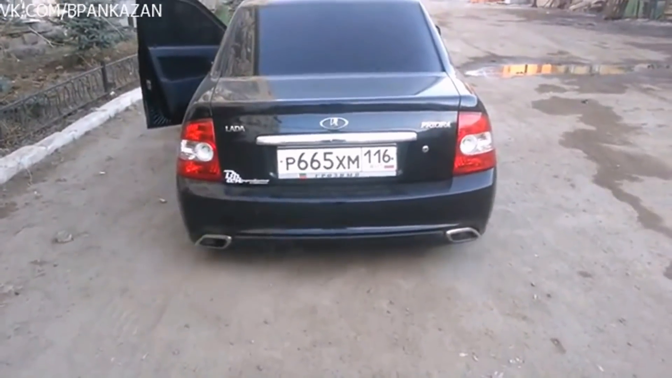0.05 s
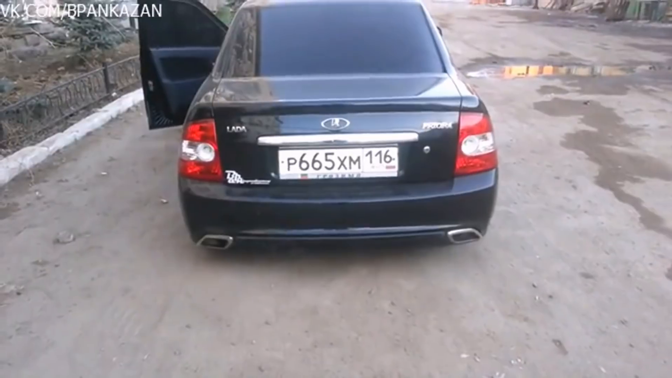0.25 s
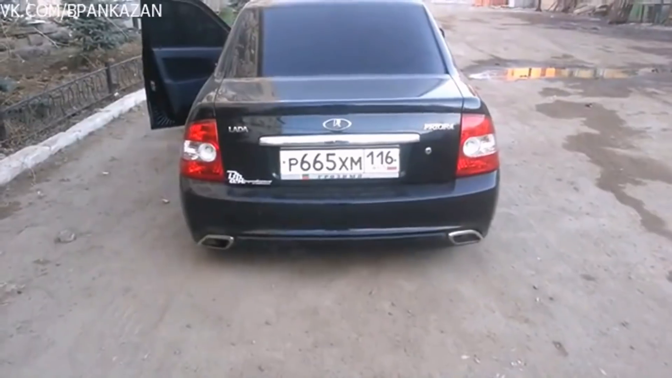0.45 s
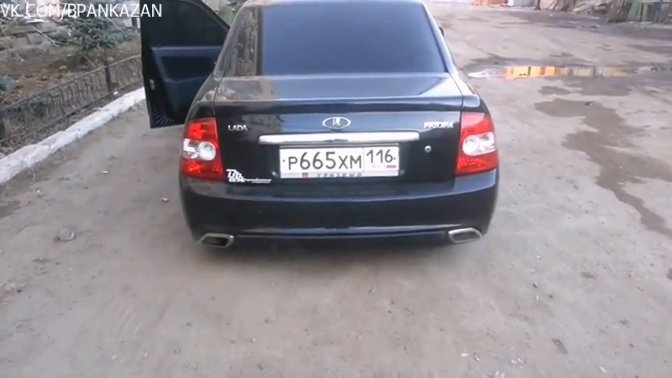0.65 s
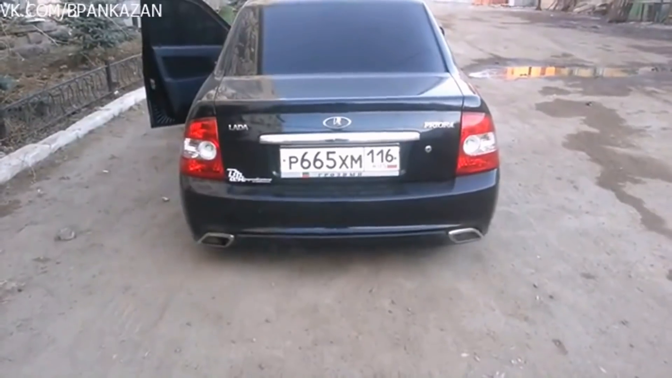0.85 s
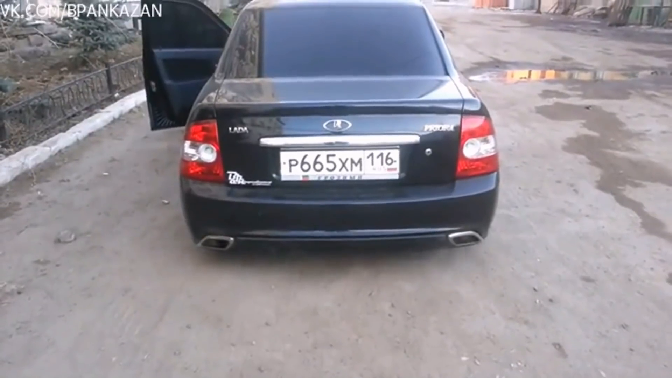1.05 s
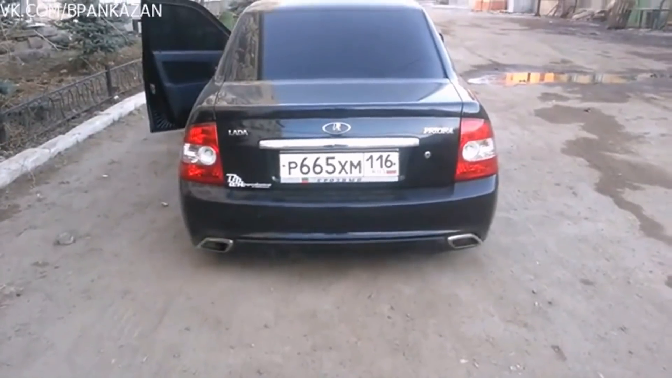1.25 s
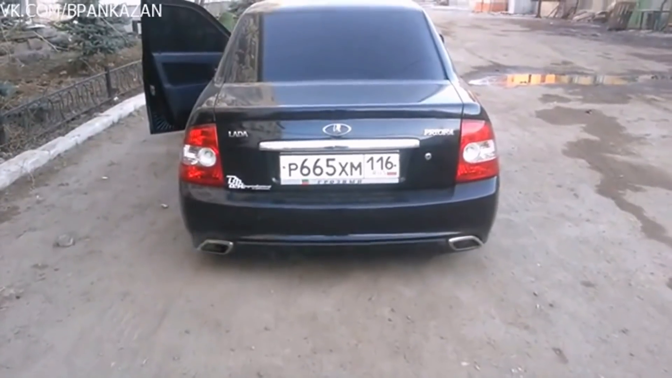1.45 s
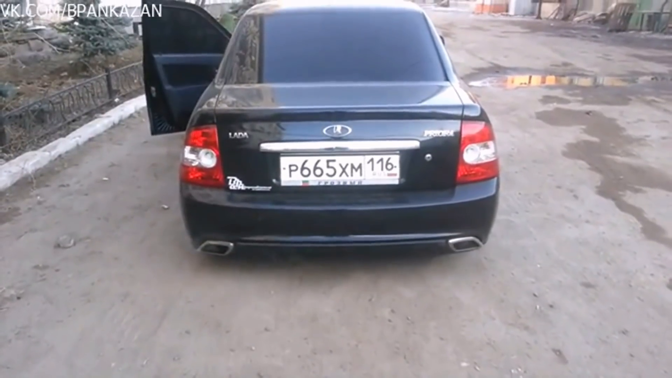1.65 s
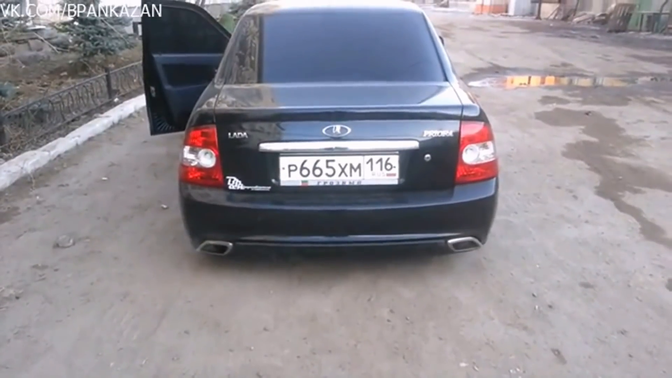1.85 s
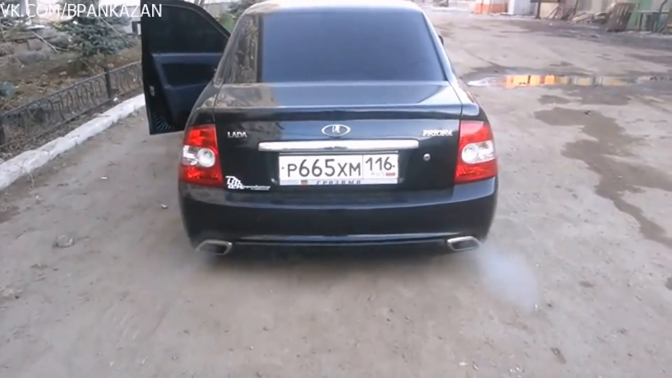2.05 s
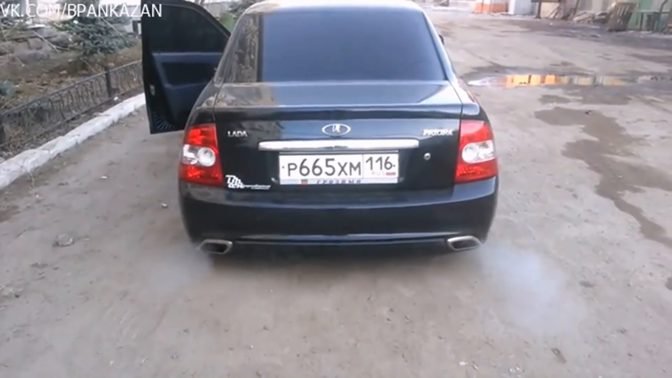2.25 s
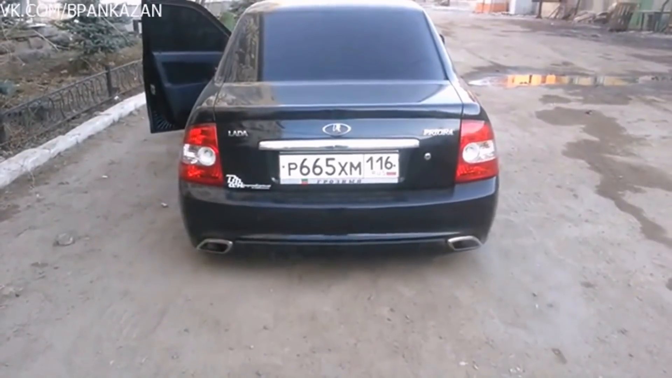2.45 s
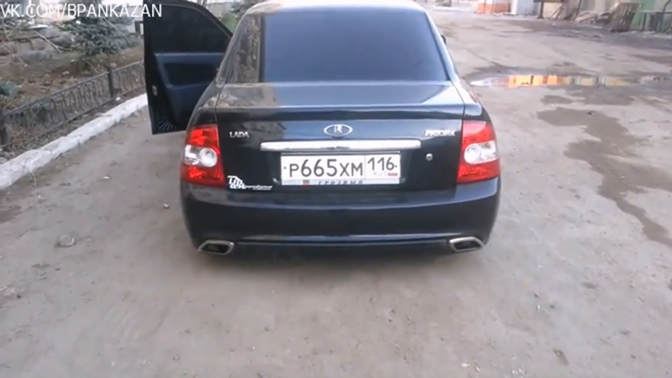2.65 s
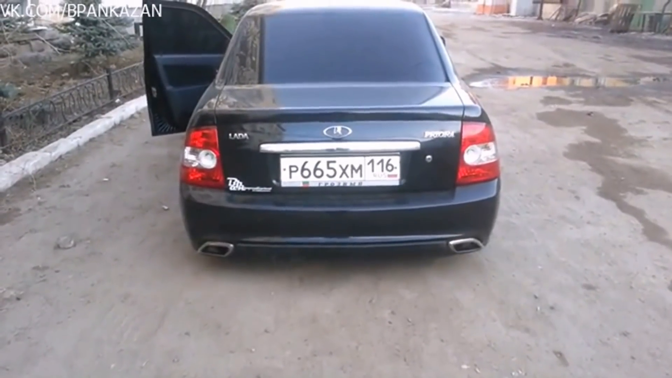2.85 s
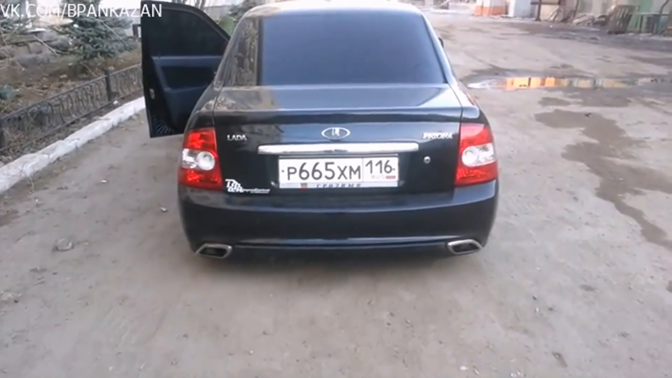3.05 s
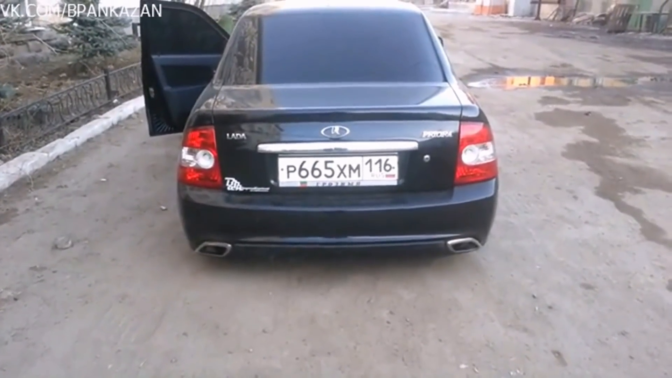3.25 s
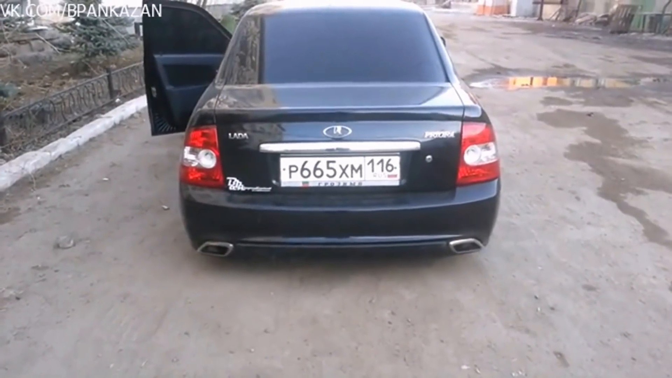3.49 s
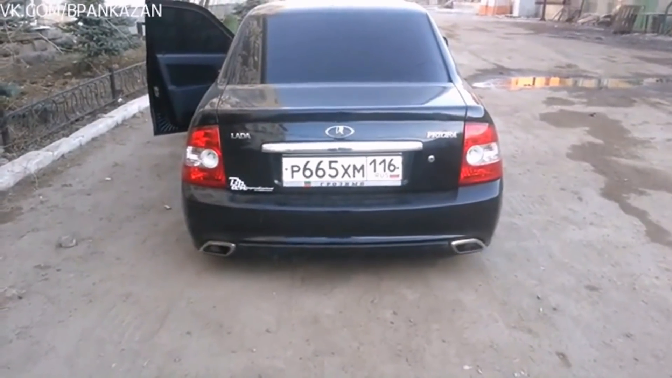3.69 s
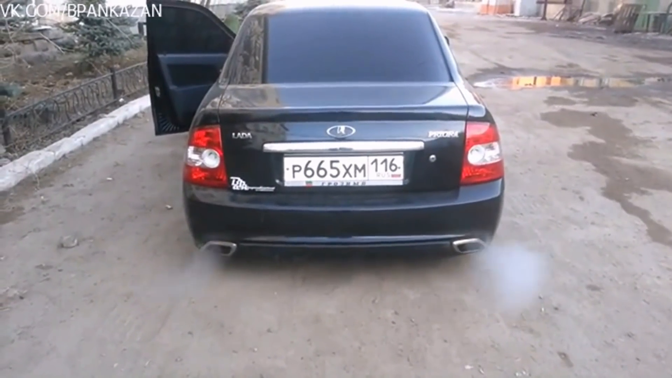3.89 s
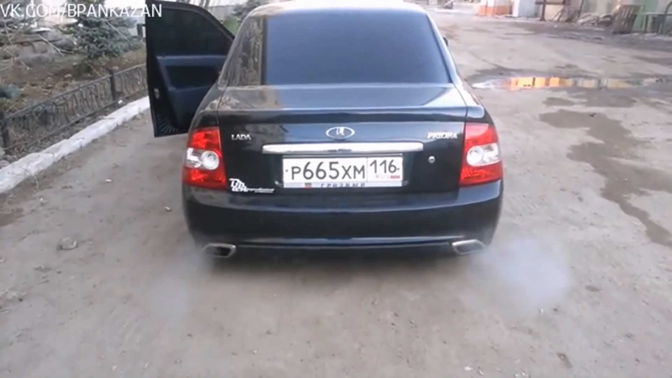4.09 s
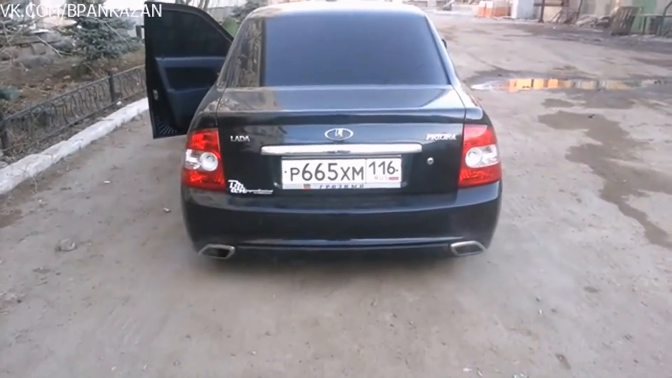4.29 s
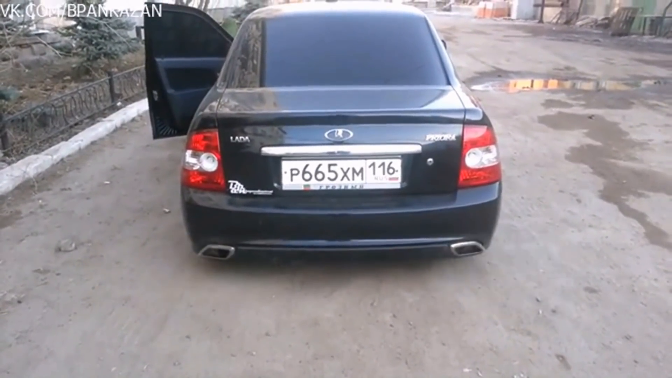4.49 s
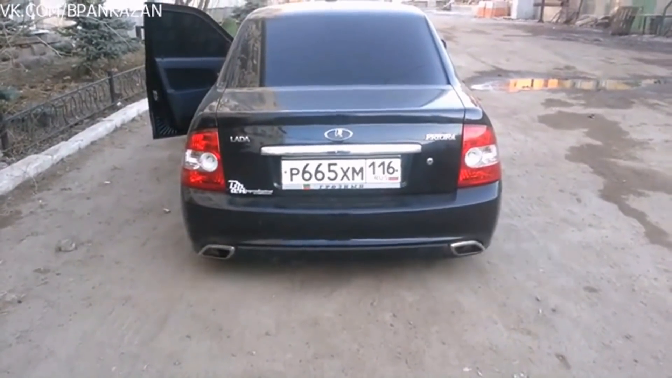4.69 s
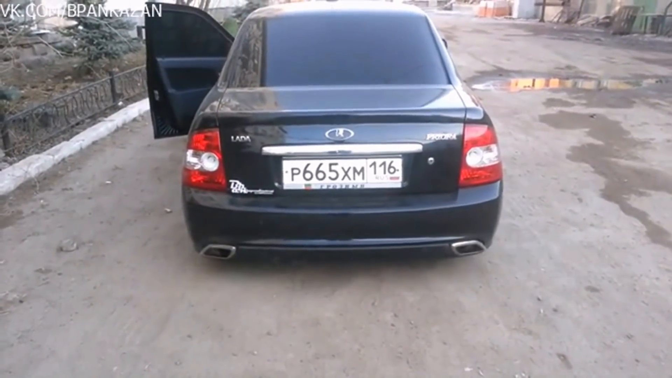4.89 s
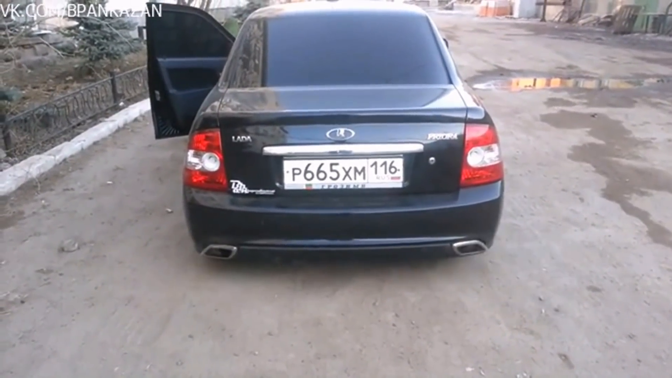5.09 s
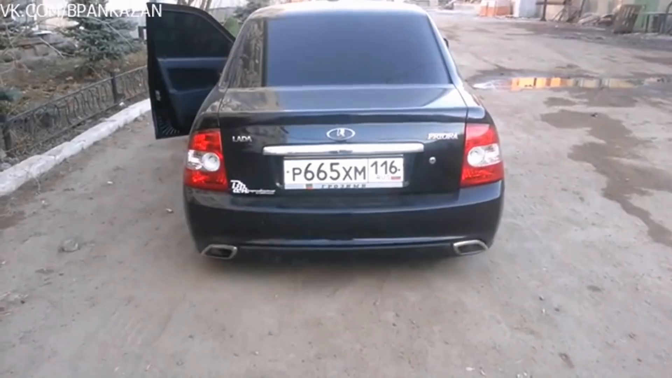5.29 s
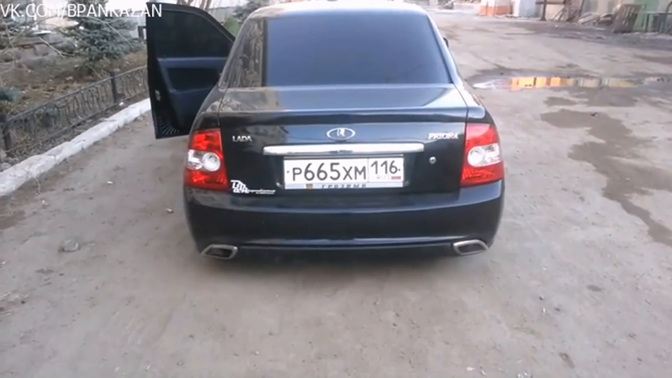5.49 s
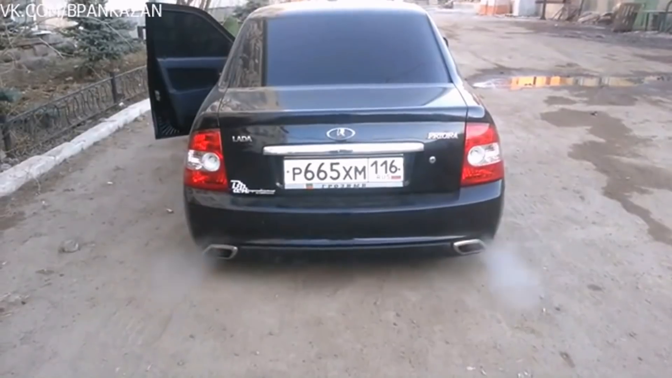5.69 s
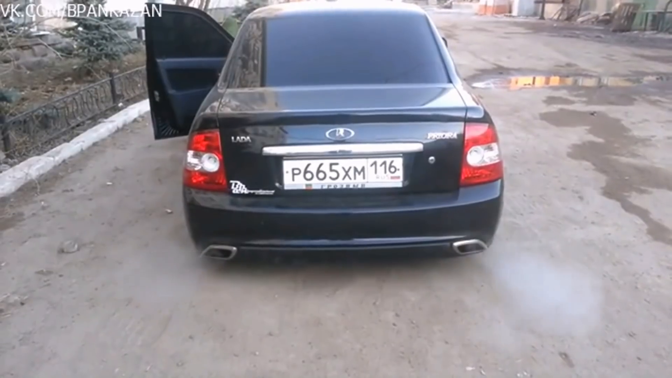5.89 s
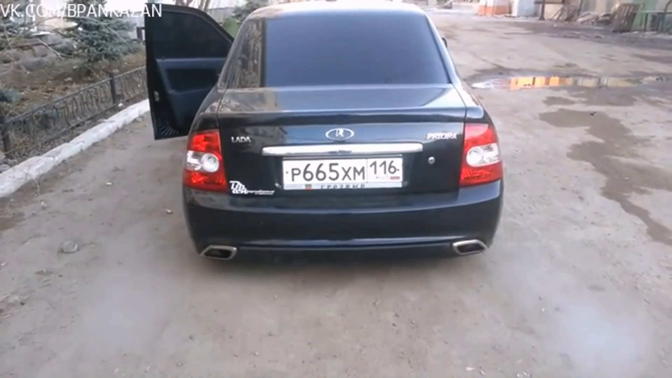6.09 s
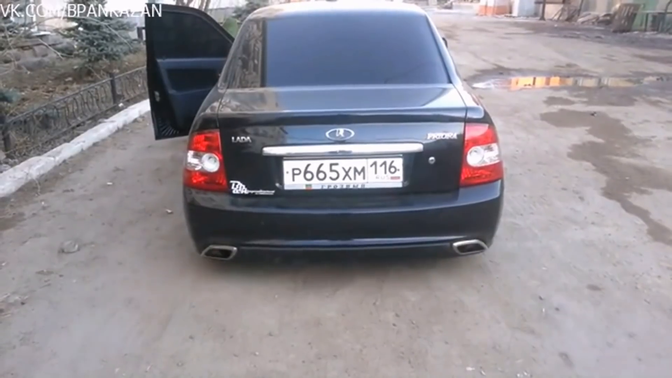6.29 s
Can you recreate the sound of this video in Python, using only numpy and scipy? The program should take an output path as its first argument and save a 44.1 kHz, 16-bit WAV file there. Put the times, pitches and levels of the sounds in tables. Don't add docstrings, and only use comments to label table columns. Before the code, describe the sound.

Close behind twin tailpipes, uneven low idling gives way to three sharp throttle blips with barking exhaust, wet spitting hiss and crackling overrun.

```python
import sys
import numpy as np
from scipy import signal
from scipy.fft import rfft, irfft, next_fast_len
from scipy.io import wavfile
from scipy.ndimage import uniform_filter1d, map_coordinates

SR = 44100
rng = np.random.default_rng(int(sys.argv[2]) if len(sys.argv) > 2 else 0)


def gain_from_db(level_db):
    decades = np.asarray(level_db, float) / 20
    return 10 ** decades


def output_pcm(signal):
    pcm = np.clip(np.atleast_2d(signal).T, -1, 1) * 32767
    wavfile.write(sys.argv[1], SR, np.round(pcm).astype(np.int16))


N = 279153


def along(points, hz):
    f, v = np.transpose(points)
    return np.interp(np.log(hz + 1), np.log(f + 1), v)


def curves(rows):
    s, *cols = np.transpose(rows)
    return [np.interp(np.arange(N) / SR, s, c) for c in cols]


def wobble(rate):
    knots = rng.standard_normal(int(N * rate / SR) + 4)
    return map_coordinates(knots, [np.arange(N) * rate / SR])


def level(x, span):
    width = int(span * SR)
    power = uniform_filter1d(uniform_filter1d(np.mean(x ** 2, axis=0), width), width)
    return x / np.sqrt(np.abs(power) + 1e-4 * np.mean(power))


def filtered(x, response):
    m = next_fast_len(N + SR // 2)
    return irfft(rfft(x, m) * response(np.fft.rfftfreq(m, 1 / SR)), m)[..., :N]


def modes(table, low_hz, top_hz):
    def fall(u):
        return 1 / (1 - u * u + 1.4j * u) ** 2

    def ring(f):
        return sum(gain_from_db(db) * 1j * f * w / (c * c - f * f + 1j * f * w) for c, w, db in table)

    return lambda f: ring(f) * fall(f / top_hz) * fall(-low_hz / (f + 1))


def tone(hz):
    return np.sqrt(2) * np.sin(2 * np.pi * np.cumsum(hz) / SR)


# frequency in Hz, likeness from 0 to 1.
LIKENESS = [(30, .55), (60, 1), (130, 0.92), (300, .95), (640, 0.86), (1400, 0.27), (3100, 0.2),
            (15000, .05)]


def spread(pair, response):
    def turn(hz):
        return np.arccos(np.clip(along(LIKENESS, hz), 0, 1)) / 2

    mid, side = filtered(pair, lambda hz: response(hz) * [np.cos(turn(hz)), np.sin(turn(hz))])
    return np.array([mid + side, mid - side])


# pedal down in seconds, strongest flow in seconds, pedal up in seconds,
# fuel returns in seconds, strength in dB.
BLIPS = [
    (-1.9, -1.6, -1.1, 1.06, -12),
    (1.894, 2.125, 2.275, 2.94, 0),
    (3.666, 3.92, 4.125, 5.035, 1),
    (5.541, 5.92, 6.075, 6.75, 12),
]


def load():
    rows = []
    for down, peak, up, fuel, db in BLIPS:
        rows += [(down - .024, .3), (down, 1)]
        rows += [(up - .045, .9), (up + .035, .3)]
        rows += [(fuel, .3), (fuel + .33, .2)]
    return curves(rows)[0]


# time in seconds, firings per second.
CRANK_RUNS = [
    [(0, 45), (.5, 48), (.65, 47), (1.1, 36), (1.87, 32)],
    [(1.894, 35), (1.94, 38), (2.0, 51), (2.05, 56), (2.11, 69), (2.27, 73), (2.95, 56), (3.3, 36),
     (3.64, 34)],
    [(3.666, 38), (3.72, 48), (3.85, 70), (3.95, 83), (4.12, 85), (4.6, 77), (5.03, 62), (5.35, 36),
     (5.52, 33)],
    [(5.541, 37), (5.58, 46), (5.65, 55), (5.75, 75), (5.89, 115), (6.0, 116), (6.1, 108), (6.33, 97)],
]


def firing_rate():
    return curves(sum(CRANK_RUNS, []))[0]


# rasp in dB,
# hiss in dB, rumble in dB, bark over body in dB, share of the blip's strength from 0 to 1.
BLIP_STAGES = [(-51, -63, -37, -13, 0), (-41, -57, -32, -8, 0), (-35, -52, -24, -9, 0),
               (-24, -56, -20, -1, 0), (-26, -39, -31, -.5, .4), (-20.5, -31.5, -33, 2.5, .15),
               (-35, -46, -35, -3, 1), (-41.5, -51, -28, -6.5, 0), (-43.5, -52.5, -28, -10, .35),
               (-35.5, -46, -31, -9.5, .9), (-36, -48, -33, -8, .1), (-43.5, -60, -36, -12, 1)]


def stages():
    jet_rate, snap = 68, .02
    rasp_share = .3
    rows, rate = [], firing_rate()
    for down, peak, up, fuel, strength in BLIPS:
        fast = np.argmax((rate > jet_rate) & (np.arange(N) > down * SR)) / SR
        when = [down - .15, down - snap,
                down, down + .065,
                min(fast, peak - snap), peak,
                up, up + snap,
                fuel - .33, fuel - .18,
                fuel, fuel + snap]
        for s, (rasp_db, hiss_db, rumble_db, bark_db, share) in zip(when, BLIP_STAGES):
            gain = share * strength
            rows.append((s, rasp_db + rasp_share * gain, hiss_db + gain,
                         rumble_db + rasp_share * min(strength, 0), bark_db))
    return curves(rows)


FILLING = [3, 1, -4, -2]


def firings(scatter, size_db):
    out = np.zeros(N + SR)
    steady = load()
    for run in CRANK_RUNS:
        s, rate = np.transpose(run)
        t = np.arange(s[0], s[-1], 1 / SR)
        turns = np.cumsum(np.interp(t, s, rate)) / SR
        when = np.interp(np.arange(int(turns[-1]) + 1), turns, t)
        loose = 1 - steady[np.minimum(when * SR + 1, N - 1).astype(int)]
        luck = rng.standard_normal((len(when), 2))
        when = when + (.008 + scatter * loose) * luck[:, 0] / np.interp(when, s, rate)
        filling_db = (.15 + loose) * np.resize(FILLING, len(when))
        blow_db = filling_db + (1.5 + size_db * loose) * luck[:, 1]
        np.add.at(out, np.abs(when * SR).astype(int), gain_from_db(blow_db))
    return out[:N]


def puff(blows, decay):
    t = np.arange(SR // 8) / SR
    shape = np.exp(-t / decay) * (1 - np.exp(-t / 0.0011))
    return signal.fftconvolve(blows, shape / np.linalg.norm(shape))[:N]


# frequency in Hz, density in dB per Hz.
RUMBLE = [(12, -48), (20, -18), (43, -21), (92, -7), (102, -17), (115, 1), (150, -18), (250, -120)]
# frequency in Hz, density in dB per Hz.
YARD_AIR = [(290, -61), (500, -10), (1170, -12.5), (1580, -20), (2360, -20.5), (5920, -37), (9510, -40),
            (12300, -43), (14400, -44), (15500, -77)]


def yard():
    rumble_db = stages()[2]
    rumble = level(spread(rng.standard_normal((2, N)), lambda hz: gain_from_db(along(RUMBLE, hz))), 0.41)
    air = level(spread(rng.standard_normal((2, N)), lambda hz: gain_from_db(along(YARD_AIR, hz))), 1)
    return gain_from_db(rumble_db) * rumble + gain_from_db(-41.5) * air


# time in seconds, level in dB.
SNAPS = [
    (.238, -14),
    (.2431, 1),
    (0.6503, -20),
    (0.6632, 1.5),
]


def ticks():
    out, t = np.zeros(N), np.arange(SR // 50) / SR
    for s, db in SNAPS:
        pull = -np.sin(2 * np.pi * 2500 * t) * np.exp(-t / .0003)
        push = .5 * (1 - np.exp(-t / .0003)) * np.exp(-t / .0008)
        ring = 0.057 * rng.standard_normal(len(t)) * np.exp(-t / 0.0025)
        out[round(s * SR):][:len(t)] += gain_from_db(db) * (pull + push + ring)
    return out * gain_from_db(np.array([[0], [-17]]))


# time in seconds, peak in dB.
LATE_BURNS = [(.445, -10), (.519, -5), (.57, -10), (.9, -10), (2.247, -8), (2.327, -22), (2.44, -38),
              (2.469, -9), (2.565, -11), (2.841, -19), (3.21, -16), (4.161, -18), (4.234, -5), (4.297, -9),
              (4.371, -19), (4.399, -2), (4.508, -24), (4.573, -5), (4.85, -18), (6.076, -16), (6.131, -11),
              (6.181, -10), (6.255, -8), (6.292, 2.5)]
# frequency in Hz, width in Hz, level in dB.
BARK_MODES = [(384, 13.7, -6), (436, 35, 5.5), (486, 29.5, -0.5), (526.8, 29, -1), (450, 210, -16),
              (668, 67, -11), (745, 43, -9), (863.5, 39, -2), (970, 21, -10), (1180, 410, -24.5)]
# frequency in Hz, width in Hz, level in dB.
RASP_MODES = [(1343, 167, -11.5), (1462, 79, 4), (1650, 290, 3.5), (2020, 67, 3), (2283, 113, 5),
              (2455, 83, -7), (3550, 4500, -38.5)]


def pops():
    blows = np.zeros(N)
    for s, db in LATE_BURNS:
        blows[round(s * SR)] = gain_from_db(db + 23.5)
    gas = puff(blows, 0.009) * rng.standard_normal((2, N))
    bark, tips = modes(BARK_MODES, 260, 1150), modes(RASP_MODES, 900, 3000)
    return spread([blows + gas[0], gas[1]], lambda f: bark(f) + gain_from_db(-17) * tips(f))


# frequency in Hz, difference in dB.
RIGHT_LOUDER = [(3000, -18.5), (4400, 5), (8000, 15), (15000, 5.5)]


def hiss(spectrum):
    def response(hz):
        return gain_from_db(along(spectrum, hz) + np.outer([-.5, .5], along(RIGHT_LOUDER, hz)))

    noise = filtered(rng.standard_normal((2, N)), response)
    return noise * np.sqrt(2 / np.mean(noise ** 2))


# frequency in Hz, density in dB per Hz.
STRONG_HISS = [(2060, -35), (3500, -5.5), (4550, -4.5), (5550, -0.5), (6690, -4), (7530, -0.5), (14000, -4),
               (14900, -11), (15200, -25), (15500, -62)]
# frequency in Hz, density in dB per Hz.
WEAK_HISS = [(1470, -37.5), (2500, -17), (2770, -23), (3230, -1), (6700, -8.5), (7420, -9.5), (11500, -13),
             (12200, -30), (14500, -29)]
# time in seconds, peak in dB, 60 dB decay in seconds.
WET_SPITS = [(1.894, -28, 0.11), (1.9235, -21.5, 0.1), (1.9475, -20.5, 0.18), (1.9749, -30, 0.23),
             (1.9927, -11, 0.092), (2.0285, -11, 0.14), (2.0494, -15, 0.059), (2.0752, -22, 0.16),
             (2.1593, -6.5, 0.066), (2.206, -13, 0.099), (2.262, -14.5, 0.085), (3.695, -15, 0.09),
             (3.711, -8, 0.095), (3.7516, -7, 0.076), (3.7728, -14, 0.12), (3.821, -9, 0.03),
             (3.836, -14.5, 0.09), (4.0093, -16, 0.11), (4.0595, -6, 0.032), (4.1096, -10.5, 0.053),
             (4.2322, -8.5, 0.03), (4.324, -10.5, 0.098), (5.5405, -21.5, 0.096), (5.5677, -19.5, 0.27),
             (5.6263, -10, 0.061), (5.646, -11, 0.13), (5.69, -13, 0.041), (5.711, -10, 0.041),
             (6.291, -1, 0.074)]
# time in seconds, peak in dB.
WEAK_SPITS = [(.4349, -35), (.51, -38), (.5566, -33), (.8819, -34), (2.6, -40), (3.44, -44), (3.61, -42),
              (3.637, -36), (3.6654, -26), (4.2986, -40), (4.397, -27), (4.457, -30), (4.546, -33),
              (4.6, -38)]


def jet(blows):
    hiss_db = stages()[1] - 5.5 + 2.55 * wobble(35)
    chopped = level(puff(blows, 0.0051)[None], 0.14)[0]
    flow = gain_from_db(hiss_db) * (1.5 + 0.64 * load() * chopped)
    t = np.arange(SR // 4) / SR
    weak_t60 = .11
    for s, db, t60 in WET_SPITS + [(s, db, weak_t60) for s, db in WEAK_SPITS]:
        spit = gain_from_db(db - 12.5 - 60 * t / t60) * (1 - np.exp(-(t / 0.003) ** 2))
        part = flow[round(s * SR):][:len(t)]
        part += spit[:len(part)]
    strong = np.clip((20 * np.log10(flow) + 47) / 11.5, 0, 1)
    return flow * (np.sqrt(strong) * hiss(STRONG_HISS) + np.sqrt(1 - strong) * hiss(WEAK_HISS))


def rasp(blows):
    ragged = blows * gain_from_db(4.5 * wobble(120))
    late = load() ** 2 * np.roll(ragged, round(.0015 * SR))
    rush = (1.45 - load()) * puff(blows, .025)
    bursts = (puff(late, .0018) + rush) * rng.standard_normal((2, N))
    torn = level(spread(bursts + .5 * late, modes(RASP_MODES, 1000, 2900)), .08)
    return gain_from_db(stages()[0] + .4 + 1.5 * wobble(14)) * torn


def through(blows, response, rough, decay, span):
    echo = 0.0044
    rough = rough * (1.2 - load())
    gas = np.sqrt(rough) * puff(blows, decay) * rng.standard_normal((2, N))
    clean = np.sqrt(1 - rough) * blows
    return level(spread([clean + gas[0], np.roll(clean, round(echo * SR)) + gas[1]], response), span)


# start in seconds, hold in seconds, level in dB.
LOW_BOOMS = [(0, .02, -25), (.18, .03, -25), (.29, .05, -17.5), (.47, .25, -14.5), (.84, .12, -26),
             (1.01, .05, -17), (1.11, .37, -22.5), (1.6, .01, -18), (1.73, .01, -20), (1.86, .11, -19),
             (2.08, .19, -26.5), (2.36, .01, -23), (2.47, .01, -28), (2.63, .01, -22), (2.78, .02, -16),
             (3.23, .01, -18), (3.35, .1, -20.5), (3.58, .1, -16), (3.83, .03, -22.5), (4.11, .06, -25),
             (4.27, .13, -23.5), (4.46, .17, -19.5), (4.8, .02, -14.5), (4.9, .18, -25), (5.27, .005, -29),
             (5.37, .07, -23.5), (5.58, .02, -15.5), (5.71, .03, -21.5), (5.92, .08, -28), (6.14, .04, -23)]


def booms():
    rise, fall, floor_db = 200, 200, -33
    t = np.arange(0, N, 64) / SR
    each = []
    for s, held, db in LOW_BOOMS:
        each.append(db - rise * np.maximum(s - t, 0) - fall * np.maximum(t - s - held, 0))
    return np.interp(np.arange(N) / SR, t, np.maximum(np.max(each, axis=0), floor_db))


def sing(bark):
    rate = firing_rate()
    shade_db = -2.5 * np.clip(rate / 60, 0, 1)
    sing_db = 8 * load() * np.clip((rate - 95) / 20, 0, 1)
    upper = filtered(bark, lambda hz: 1 / (1 + (620 / (hz + 1)) ** 12))
    return bark + (gain_from_db(shade_db + sing_db) - 1) * upper


# frequency in Hz, width in Hz, level in dB.
DRONE_MODE = [(145.9, 7.8, 0)]
# frequency in Hz, width in Hz, level in dB.
BODY_MODES = [(187, 46, -19), (227, 5.5, -31), (278.8, 22, 9), (311.9, 22.5, 7.5), (353, 16, -16.5),
              (296, 100, -19.5)]
# time in seconds, level in dB.
BLOWING = [
    [(0, -20.5), (.16, -22.5), (.255, -13.5), (.41, -23), (.56, -9), (.66, -18), (.99, -19), (1.12, -25),
     (1.8, -25.5), (1.912, -18)],
    [(1.924, -10.5), (2.0, -12.5), (2.8, -14), (2.99, -23.5), (3.14, -19.5), (3.54, -27), (3.57, -20),
     (3.683, -16)],
    [(3.695, -8.5), (3.93, -15.5), (4.21, -12.5), (4.64, -13), (5.02, -17), (5.07, -26), (5.2, -20),
     (5.44, -26), (5.533, -18.5)],
    [(5.545, -11), (5.66, -11), (5.95, -18.5), (6.11, -10), (6.33, -12.5)],
]


def exhaust(blows):
    drone_hz = 136.5 + 5 * load() + 1.5 * wobble(8)
    drone_db = booms()
    body_db = curves(sum(BLOWING, []))[0]
    bark_db = body_db + stages()[3]
    half = firing_rate() / 2
    below, above = [uniform_filter1d(half * (300 // half + k), size=SR // 50) for k in (0, 1)]
    drone_blown = through(blows, modes(DRONE_MODE, 50, 230), rough=.5, decay=0.023, span=0.1)
    drone = 1.2 * tone(drone_hz) + 0.38 * drone_blown
    body_blown = through(blows, modes(BODY_MODES, 150, 480), rough=.4, decay=.03, span=.05)
    body = (.62 - .2 * load()) * .7 * (tone(below) + tone(above)) + .85 * body_blown
    bark = through(blows, modes(BARK_MODES, 260, 1050), rough=.6, decay=.03, span=.06)
    return gain_from_db(drone_db) * drone + gain_from_db(body_db) * body + gain_from_db(bark_db) * sing(bark)


def scene():
    blows = firings(scatter=.05, size_db=2)
    return yard() + ticks() + pops() + jet(blows) + rasp(blows) + exhaust(blows)


def roll_off(x):
    return signal.sosfilt(signal.butter(12, 15760, fs=SR, output="sos"), x)


def record(dry):
    top, hard = .7, 5
    rounded = dry / (1 + np.abs(dry / top) ** hard) ** (1 / hard)
    mix = filtered(rounded, lambda hz: gain_from_db(-14 * (hz > 14800)))
    return roll_off(mix)


dry = scene()
out = record(dry)
output_pcm(out)
```